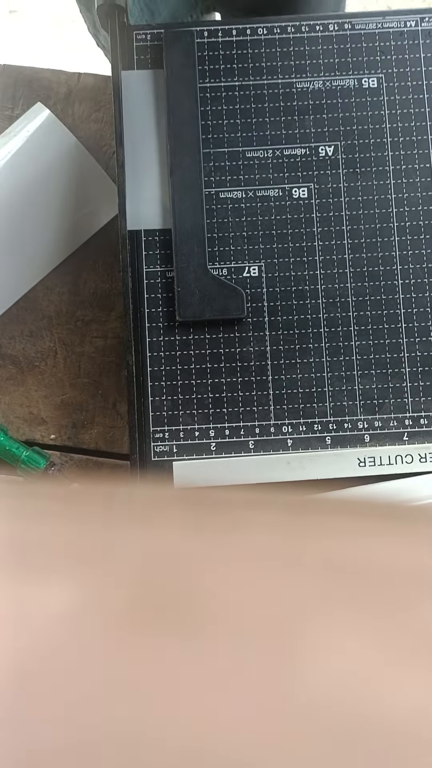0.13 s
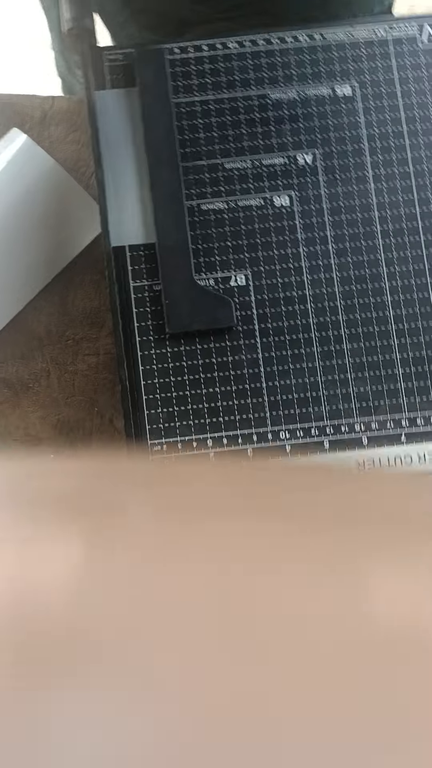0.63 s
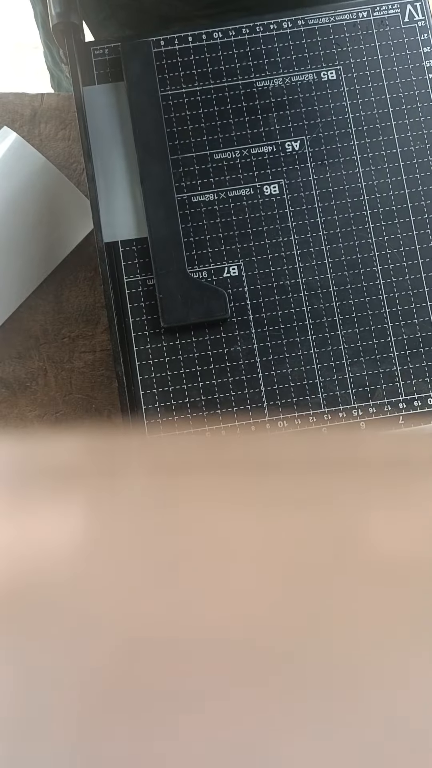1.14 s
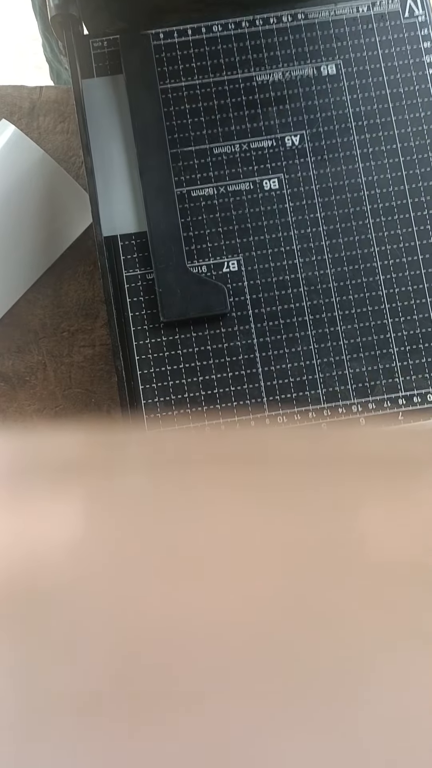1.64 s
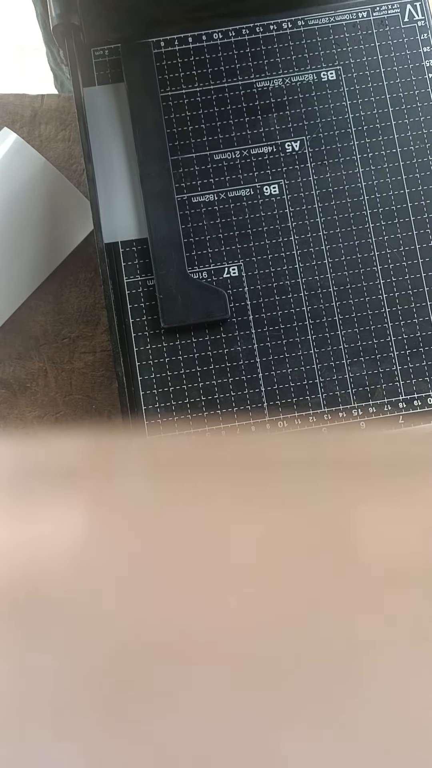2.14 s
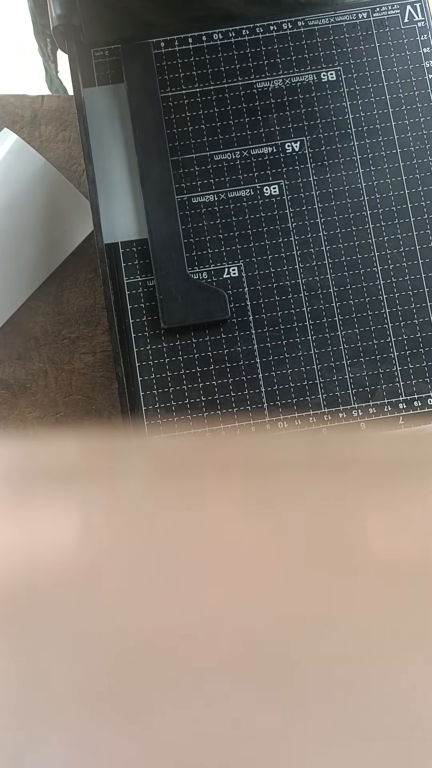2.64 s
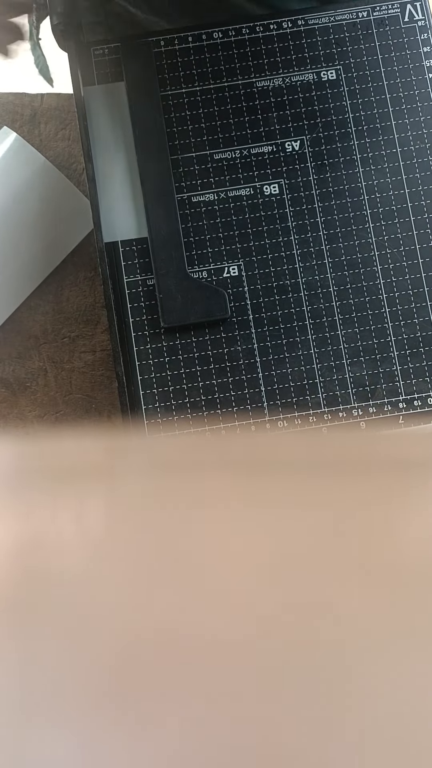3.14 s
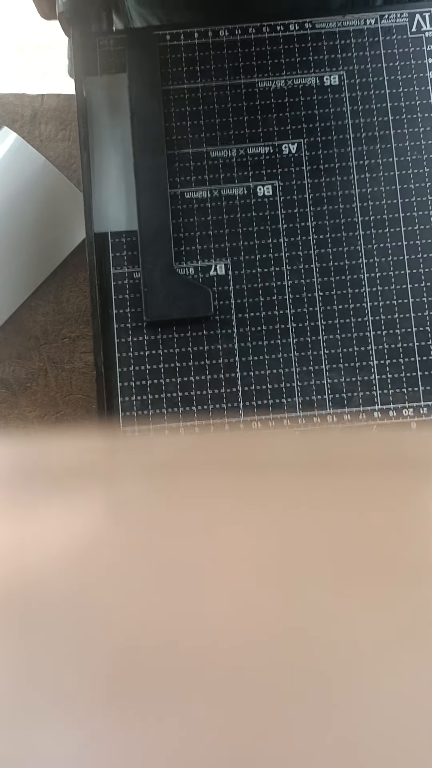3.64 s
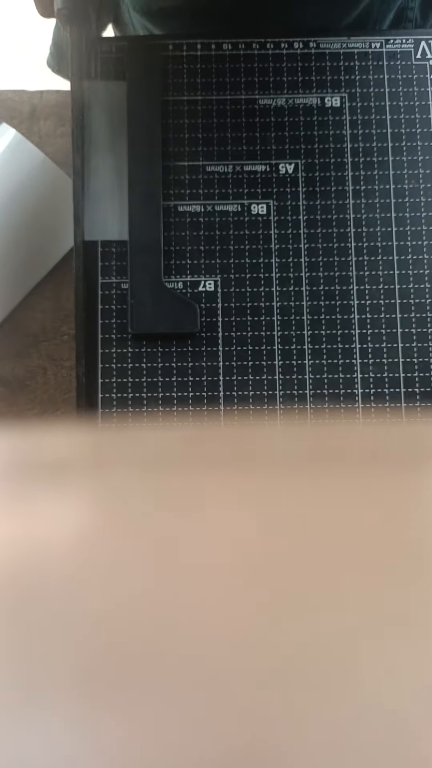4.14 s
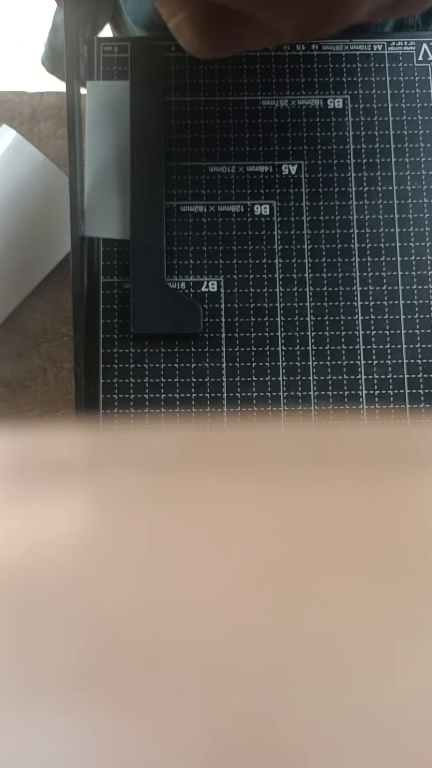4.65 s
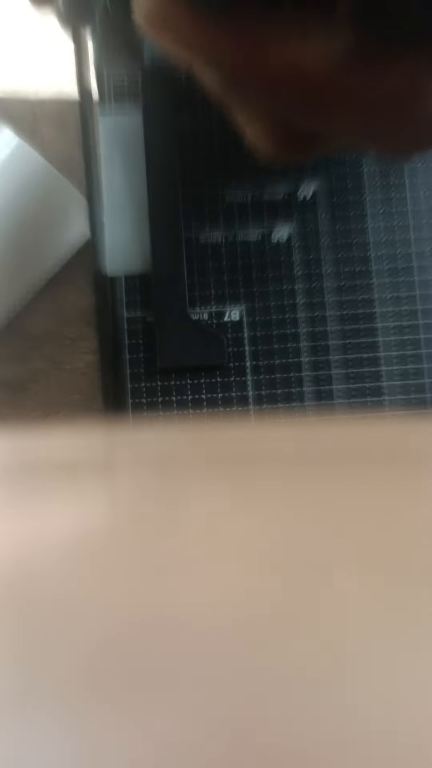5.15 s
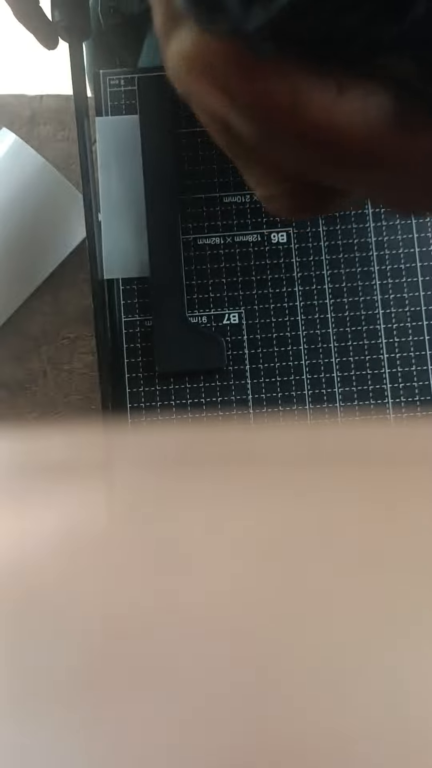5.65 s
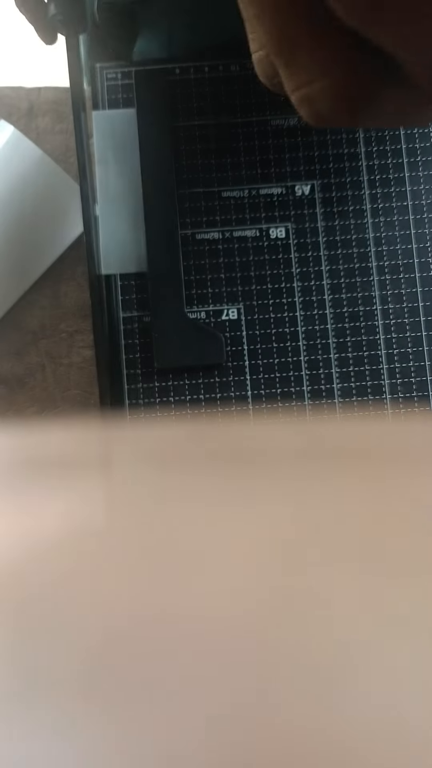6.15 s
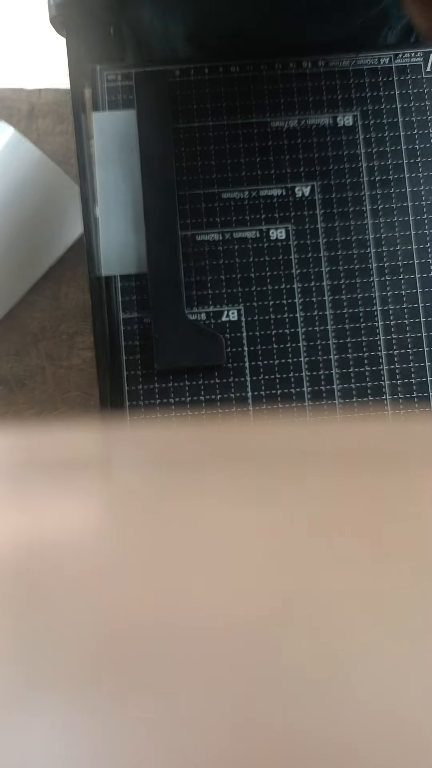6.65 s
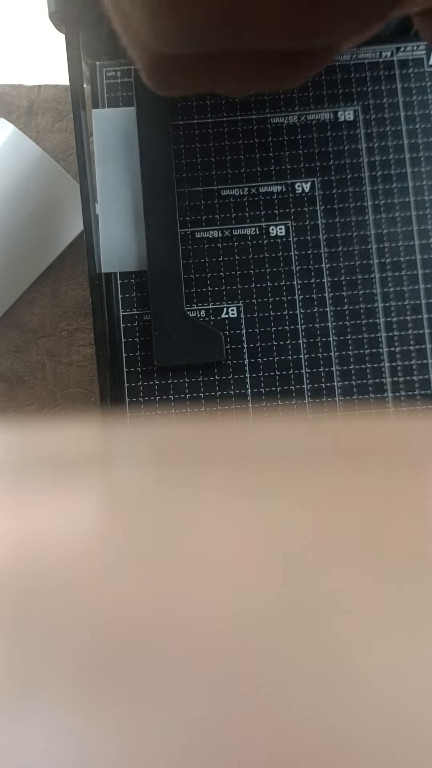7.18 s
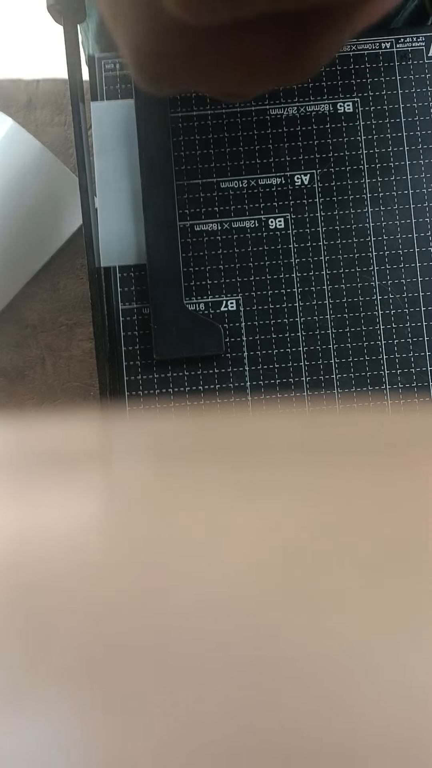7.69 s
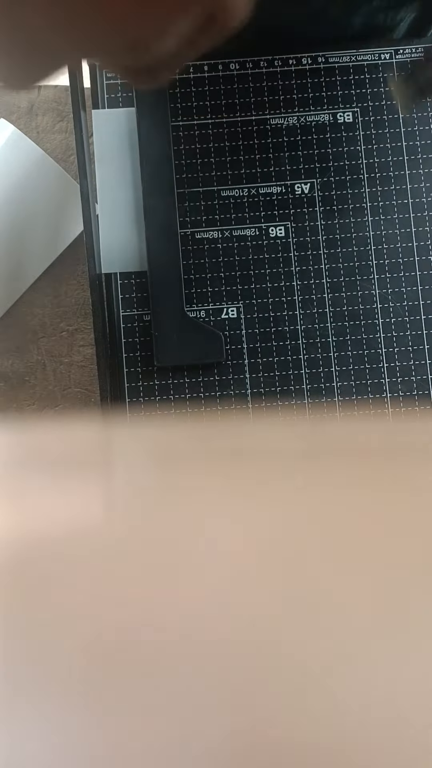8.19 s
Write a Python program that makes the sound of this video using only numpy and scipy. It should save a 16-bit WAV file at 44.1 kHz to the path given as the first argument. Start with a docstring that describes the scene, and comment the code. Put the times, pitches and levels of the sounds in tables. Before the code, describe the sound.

A handheld phone outdoors picks up nonstop rattling crow caws at middle distance, with reverberant small-bird whistles and quick twittering phrases. Occasional dull claps echo across the yard. Midway come very close dry ticks, a double hollow knock, rough skin rubbing, bright little pings and low grip thumps, loudest just after four seconds and again past five. Afterwards cawing and chirping resume over quiet air and thin insect hiss.

```python
"""A walled yard: hoarse crows caw in close succession, each a pulsed voice exciting throat resonances.
Small birds sing phrases, whistles and chips, all gliding sines, with wall echoes of sparse decaying taps.
Insects hiss far off in narrow-band noise, and something claps across the yard in decaying noise bursts.
A hand knocks and rubs the phone and a hollow board: grains of friction, ringing modes and bright pings;
one rough stroke of it, at 4.07 s, is made by the same pulsed voices as the caws."""
import sys
import numpy as np
from scipy import signal
from scipy.fft import rfft, irfft
from scipy.io import wavfile
from scipy.ndimage import uniform_filter1d

SR = 44100
rng = np.random.default_rng(int(sys.argv[2]) if len(sys.argv) > 2 else 0)


def wav_out(sig):
    """Save sig, one row per channel (or a flat mono array), as 16-bit PCM at SR to the path in sys.argv[1]."""
    wavfile.write(sys.argv[1], SR, np.round(np.clip(np.atleast_2d(sig).T, -1, 1) * 32767).astype(np.int16))


def boost_factor(decibels):
    """Convert a level in decibels to a linear amplitude factor."""
    exponent = np.asarray(decibels, float) / 20
    return 10 ** exponent


N = 366030


def evened(x):
    """Energy normalisation: scales a signal to rms 1."""
    return x / np.sqrt(np.mean(x ** 2) + 1e-20)


def read(points, hz):
    """Interpolation over logarithmic frequency, the scale on which spectra are drawn."""
    f, value = np.transpose(points)
    return np.interp(np.log(hz + 1), np.log(f + 1), value)


def curves(rows):
    """Piecewise-linear control: one curve over the whole scene for each column after time."""
    s, *columns = np.transpose(rows)
    return [np.interp(np.arange(N) / SR, s, c) for c in columns]


def add(mix, s, sound):
    """Superposition: adds a sound to the mix, starting at s seconds."""
    part = mix[max(round(s * SR), 0):][:len(sound)]
    part += sound[:len(part)]


def wander(size):
    """Random drift: white noise averaged twice over size samples, rms 1."""
    return evened(uniform_filter1d(uniform_filter1d(rng.standard_normal(N), size), size))


def resonate(x, hz, width):
    """Heterodyne resonance: shifts hz down to zero, smooths with a double pole, and shifts back."""
    turn = np.exp(2j * np.pi * np.cumsum(hz * np.ones(len(x))) / SR)
    r = np.exp(-np.pi * width / SR)
    smooth = signal.lfilter([(1 - r) ** 2], [1, -2 * r, r * r], x / turn)
    return 2 * (turn * smooth).real


def coloured(x, spectrum):
    """Spectral shaping: weights each frequency of x by the spectrum; rms 1."""
    gain = boost_factor(read(spectrum, np.fft.rfftfreq(len(x), 1 / SR)))
    return evened(irfft(rfft(x) * gain, len(x)))


def patchy(x, patchy_db):
    """Random modulation in time and frequency: lumps a few hundred Hz by a few tens of ms."""
    z = signal.stft(x, nperseg=512)[2]
    patches = uniform_filter1d(rng.standard_normal(z.shape), size=9, axis=0)
    patches = evened(uniform_filter1d(patches, size=7, axis=1))
    return signal.istft(z * boost_factor(patchy_db * patches), nperseg=512)[1][:N]


def grains(per_s, spread_db):
    """Shot noise: random impulses at a mean rate, with exponentially spread levels."""
    happens = rng.random(N) < per_s / SR
    level_db = spread_db * np.minimum(rng.exponential(1, N), 4)
    return rng.standard_normal(N) * happens * boost_factor(level_db)


def pressure(s, hold, db, rise, fall):
    """Energy summation of strokes that rise, hold and fall along straight dB slopes; gives dB."""
    t = np.arange(0, N / SR + .002, .001)[:, None]
    each = db - rise * np.maximum(s - t, 0) - fall * np.maximum(t - s - hold, 0)
    total_db = 10 * np.log10((boost_factor(each) ** 2).sum(1) + 1e-14)
    return np.interp(np.arange(N) / SR, t[:, 0], total_db)


def bursts(events, spectrum):
    """Exponential decay: noise starts at once and dies, above 10.5 kHz 2.5 times as fast in dB."""
    t, mix = np.arange(SR // 2) / SR, np.zeros(N)
    noise = patchy(coloured(rng.standard_normal(N + 512), spectrum), patchy_db=3.5)
    noise = evened(np.tile(noise, 2))  # cut at the event's own time, so burst colours vary
    dull = signal.sosfiltfilt(signal.butter(4, 10500, fs=SR, output="sos"), noise)
    treble = evened(noise - dull)
    for s, db, treble_db, t60 in events:
        fall_db = 60 * t / max(t60, .002)
        at = slice(round(s * SR), round(s * SR) + len(t))
        body = boost_factor(db - fall_db) * dull[at]
        top = boost_factor(treble_db - 2.5 * fall_db) * treble[at]
        add(mix, s, body + top)
    return mix


# reverberation of the walls and trees: (frequency [Hz], t60 [s])
YARD_DECAY = [(300, 0.086), (600, 0.59), (1400, 0.67), (4000, 0.34), (7000, 0.29), (15000, 0.39)]


def yard(x, wet_db):
    """Reverberation: direct sound plus sparse echoes, each band dying at its own speed."""
    taps = np.zeros(SR)
    at = np.arange(300, SR - 20, 20)
    taps[at + rng.integers(0, 20, len(at))] = rng.choice([-1., 1.], len(at))
    hz, t, z = signal.stft(taps, SR, nperseg=256)
    decay = boost_factor(-60 * t / read(YARD_DECAY, hz)[:, None])
    tail = signal.istft(z * decay, SR, nperseg=256)[1]
    echo = boost_factor(wet_db) * signal.fftconvolve(x, tail / np.linalg.norm(tail))[:N]
    return (x + echo) / np.sqrt(1 + boost_factor(wet_db) ** 2)


# caws, and one rough stroke of the rubbing hand at 4.071 s:
# (peak time [s], rise [s], fall [s], effort [dB], top pitch before the voice factors [Hz],
# upper rasp [dB]: in a caw, strong when the bird faces the phone)
HOARSE_EVENTS = [(0.0, 0.082, 0.1698, -43, 562, -20.5), (.27, 0.12, .16, -34, 594.5, -22.5),
                 (0.409, 0.087, 0.12, -35, 578, -29), (0.599, 0.11, 0.27, -37.5, 568, -36.5),
                 (0.829, 0.087, 0.3, -31.5, 602.3, -23), (1.191, 0.12, 0.19, -36, 606.7, -56.5),
                 (1.371, 0.074, 0.096, -33.5, 555, -22), (1.499, 0.097, 0.15, -31, 549.8, -25.5),
                 (1.76, 0.14, 0.097, -34, 605.6, -32), (1.969, 0.2, 0.23, -30.5, 601.3, -25.5),
                 (2.29, 0.12, 0.15, -35, 612, -36.5), (2.499, 0.18, 0.17, -27, 604.2, -20.5),
                 (3.059, 0.22, 0.12, -27, 589.4, -19), (3.53, 0.25, 0.23, -28, 595, -23),
                 (3.841, 0.1, 0.21, -31.5, 562.4, -15), (4.071, 0.11, 0.068, -24, 548.5, -12.5),
                 (4.35, 0.11, 0.19, -32.5, 577.3, -19.5), (4.571, 0.18, 0.18, -29, 591.5, -20),
                 (4.96, 0.2, 0.092, -31, 593.5, -21.5), (5.08, 0.09, 0.14, -28.5, 585.6, -13),
                 (5.27, 0.13, 0.14, -34, 560.8, -28), (5.65, 0.19, 0.19, -32.5, 527, -22),
                 (5.931, 0.055, 0.096, -40, 531.6, -22.5), (6.17, 0.21, 0.29, -29, 577, -22),
                 (6.58, 0.11, 0.12, -31.5, 609.9, -18.5), (6.759, 0.13, 0.25, -28, 612.2, -22.5),
                 (7.138, 0.092, 0.1, -38, 535.9, -19.5), (7.301, 0.15, 0.14, -30, 561.8, -25),
                 (7.43, 0.088, 0.21, -32, 539, -23), (7.696, 0.089, 0.13, -39.5, 526.4, -8.5),
                 (7.858, 0.14, 0.21, -32.5, 556.5, -27.5), (8.272, 0.08, 0.15, -37, 543, -33.5)]


def hoarse_controls():
    """Articulation: each caw or stroke is a dome; pitch and throat sag at its ends; the loudest leads."""
    edge_db, dome_power = -14, 2.6  # effort lost one rise or fall from the peak; squareness of the dome
    pitch_sag, rasp_sag, start_sag = .12, 0.1, .5  # shares lost by the end; part of that at the start
    beak_open, beak_closing, rasp_edge_db = 1.0605, 0.088, -6.5  # the beak scales the throat
    peak, rise, fall, db, top_hz, rasp_db = np.transpose(HOARSE_EVENTS)
    t = np.arange(0, N / SR + .004, .002)[:, None]
    away = np.where(t < peak, (peak - t) / rise, (t - peak) / fall)
    power = boost_factor(np.maximum(db + edge_db * away ** dome_power, -200)) ** 2
    lead = power / power.sum(1, keepdims=True)
    edge = np.minimum(away, 1) ** 2
    sag = np.where(t < peak, start_sag * edge, np.minimum(away, 1) ** 1.3)
    pitch_hz = top_hz * (1 - pitch_sag * sag)
    beak = beak_open - beak_closing * sag
    rasp = rasp_db + rasp_edge_db * edge
    arch = 1 - rasp_sag * sag
    effort_db = 10 * np.log10(power.sum(1))
    controls = [effort_db] + [(lead * c).sum(1) for c in (pitch_hz, beak, rasp, arch)]
    return [np.interp(np.arange(N) / SR, t[:, 0], c) for c in controls]


def formants(drive, modes, scale, drift, size):
    """Parallel resonances: drifting modes of alternating sign, all moved together by scale."""
    total = 0
    for k, (f, width, db) in enumerate(modes):
        hz = f * scale * (1 + drift * wander(size))
        total = total + (-1) ** k * boost_factor(db) * resonate(drive, hz, width)
    return total


# throat resonances before beak and body size scale them: (frequency [Hz], width [Hz], level [dB])
THROAT_MODES = [(1116.5, 436, 6.5), (1332, 440, 10), (1563, 301, 7), (1848, 180, -4)]
# the throat passes little outside this band: (low edge [Hz], high edge [Hz])
THROAT_BAND = [820, 2010]
# rasp resonances: (factor on the rasp centre [ratio], width [Hz], level [dB])
RASP_MODES = [(.77, 402, 6.5), (1.0, 302, 11), (1.17, 340, -2), (1.8, 1237, -4.5)]
# throat scale of the leading bird, a smaller factor sounds lower: (time [s], factor on the throat modes
# [ratio])
LEADER_THROAT_SCALE = [(0, 0.95), (.6, 1.01), (.9, 0.99), (1.2, 1.03), (1.5, 0.99), (2.5, 1.013), (3.1, 1.01),
                       (4.1, 0.99), (4.6, 1.007), (5.3, 0.97), (5.65, 0.93), (6.2, 1.017), (6.8, 0.99), (7.4, 0.98),
                       (7.9, 0.92), (8.25, 0.9)]
# the flock as a whole, before voice factors and sag; the low tone is the crows' chest,
# but its high level at 4.0 s belongs to the stroke of the rubbing hand:
# (time [s], rattle rate [1/s], low tone level [dB], rasp centre [Hz])
FLOCK_CURVES = [(0, 110, -32.5, 2670), (.35, 105, -26, 2680), (.65, 101, -20, 2790), (.95, 92, -17.5, 2870),
                (1.25, 109, -21.5, 2970), (1.42, 106, -28, 2850), (1.6, 109, -20.5, 2900),
                (1.85, 90, -23, 3030), (2.3, 89, -23.5, 2860), (2.55, 78.4, -20, 2690),
                (3.05, 94.7, -15.5, 2840), (3.5, 94.3, -24, 2930), (4.0, 87, -6, 2680),
                (4.5, 71, -20, 2930), (5.1, 68, -17.5, 2900), (5.65, 88, -15.5, 3270),
                (6.2, 88.4, -21, 3210), (6.58, 107, -16.5, 2940), (6.7, 119, -18, 3340),
                (6.85, 112, -18.5, 3140), (7.1, 98, -40.5, 2920), (7.27, 87, -17.5, 3000),
                (7.48, 88.4, -17.5, 2990), (7.6, 94, -28, 2860), (7.9, 98, -17, 2420),
                (8.2, 103, -28, 2790)]


def crows_and_rough_stroke():
    """Source and filter: three rattling voices excite one throat; the stroke at 4.07 s shares them."""
    effort_db, pitch_hz, beak, rasp_db, arch = hoarse_controls()
    rattle, low_tone_db, rasp_hz = curves(FLOCK_CURVES)
    drive = 0
    for factor, share in ((1.001, 0.63), (.87, 0.55), (.765, 0.45)):
        unsteady = 1 + 0.00625 * wander(size=300) + .015 * wander(size=3000)
        turns = np.cumsum(factor * pitch_hz * unsteady) / SR
        voice = sum(np.cos(2 * np.pi * k * turns) for k in range(1, 11))
        uneven = 1.05 + 0.03 * wander(size=600) + 0.04004 * wander(size=4000)
        beats = np.cumsum(factor * rattle * arch * uneven) / SR  # of a slower membrane
        chop = 0.07 + np.sin(np.pi * beats) ** 4  # sidebands at the rattle rate
        drive = drive + share * chop * (evened(voice) + .4 * rng.standard_normal(N))
    low_tone = resonate(drive, pitch_hz * (1 + .08 * wander(size=3000)), 190)
    low_tone = low_tone * boost_factor(3 * wander(size=1200))  # comes and goes
    throat = formants(drive, THROAT_MODES, beak * curves(LEADER_THROAT_SCALE)[0], drift=0.018, size=2500)
    throat = signal.sosfilt(signal.butter(3, THROAT_BAND, "band", fs=SR, output="sos"), throat)
    rasp = formants(drive, RASP_MODES, rasp_hz * arch, drift=0.02, size=3000)
    voices = evened(throat) + boost_factor(low_tone_db) * evened(low_tone) + boost_factor(rasp_db) * evened(rasp)
    return yard(boost_factor(effort_db) * voices, wet_db=1.0)


# insect loudness: (time [s], level [dB])
INSECT_LEVEL = [(0.0, -73), (0.95, -61), (2.0, -62.5), (3.3, -58), (4.4, -59), (6.7, -59), (8.3, -60)]


def insects():
    """Band-limited noise: a high hiss whose level drifts and flickers."""
    spectrum = [(7000, -76.5), (8200, -8.5), (8900, 3.5), (9900, 9.5), (10500, -6.5), (11200, -37.5)]
    hiss = coloured(rng.standard_normal(N), spectrum)
    return boost_factor(curves(INSECT_LEVEL)[0] + 0.4 * wander(size=500)) * hiss


# spectrum of the quiet air: (frequency [Hz], level [dB])
AIR_SPECTRUM = [(30, -10), (100, -10.5), (300, -15), (800, -7), (1300, -1), (1700, -10.5), (2200, -20),
                (4000, -22), (6700, -23.5), (8000, -53), (11000, -51.5)]


def air():
    """Ambient noise: a steady coloured floor, patchy in time and frequency."""
    return boost_factor(-58) * patchy(coloured(rng.standard_normal(N), AIR_SPECTRUM), patchy_db=3.5)


# shifts of the grip: (time [s], level [dB], hold [s])
GRIP_SHIFTS = [(0.025, -55.5, 0.015), (0.637, -63, 0.028), (1.975, -73, 0.08), (2.248, -71, 0.014),
               (2.567, -62, 0.027), (2.792, -32.5, 0.0076), (2.823, -52, 0.012), (3.034, -43, 0.052),
               (3.282, -53, 0.061), (3.364, -45.5, 0.032), (3.608, -48.5, 0.086), (3.755, -38.5, 0.025),
               (3.864, -44, 0.035), (3.96, -53, 0.0098), (4.154, -48, 0.018), (4.232, -52, 0.024),
               (4.416, -51, 0.055), (4.728, -54, 0.036), (4.854, -42, 0.044), (5.045, -27, 0.031),
               (5.133, -41, 0.03), (5.212, -20.5, 0.012), (5.304, -38, 0.083), (5.48, -63.5, 0.17),
               (6.017, -71, 0.024), (6.16, -64.5, 0.034), (6.259, -74, 0.015), (6.543, -54, 0.055),
               (6.972, -80, 0.03), (7.481, -70.5, 0.03346), (7.638, -51, 0.024), (7.704, -38.5, 0.018),
               (7.8, -50, 0.01), (7.982, -50.5, 0.021), (8.277, -49, 0.037)]


def grip_rumble():
    """Handling noise: low-frequency noise swells with each shift of the grip, above a faint rest."""
    s, db, hold = np.transpose(GRIP_SHIFTS)
    rise_db_per_s, fall_db_per_s, rest_db = 1799.5, 353.5, -68.5
    grip = boost_factor(pressure(s, hold, db, rise_db_per_s, fall_db_per_s)) + boost_factor(rest_db)
    spectrum = [(20, -10.5), (45, -0.5), (78, 8.5), (100, 1.5), (140, 7), (200, -3.5), (400, -16.5),
                (900, -88.0)]
    return grip * coloured(rng.standard_normal(N), spectrum)


def note(db, length, start_hz, end_hz, bend=2):
    """Frequency modulation: a gliding sine with a slight 190 Hz flutter and soft ends."""
    u = np.linspace(0, 1, round(max(length, .003) * SR))
    # bend 2 starts gently, steepens and settles; bend 1 is steepest as it arrives
    glide = np.cos(np.pi / 2 * np.minimum(u / 0.895, 1)) ** bend
    flutter = 1 + 0.011 * np.sin(2 * np.pi * (190 * u * length + rng.random()))
    hz = (end_hz + (start_hz - end_hz) * glide) * flutter
    return boost_factor(db) * np.sin(2 * np.pi * np.cumsum(hz) / SR) * signal.windows.tukey(len(u), .7)


# single chips, tweets and coos, and one steady low chest tone of a crow at 1.42 s:
# (time [s], level [dB], length [s], start pitch [Hz], end pitch [Hz])
SINGLE_TONES = [(.03, -46.5, 0.06, 164, 166), (.135, -44.5, 0.064, 499, 485), (.36, -55, 0.096, 700, 648),
                (.56, -47.5, 0.045, 641, 566), (1.29, -56, 0.09, 610, 608), (1.42, -40, .2, 527, 521.2),
                (0.586, -68, 0.095, 4160, 4050), (0.814, -78, 0.075, 4750, 5100),
                (1.14, -66, 0.1, 6400, 7000), (1.182, -70, 0.074, 3780, 3880),
                (1.244, -56.5, 0.058, 7140, 6370), (1.443, -60.5, 0.13, 5150, 4890),
                (1.715, -41.5, 0.035, 650, 700), (1.93, -40.5, 0.055, 657, 638),
                (2.119, -42, 0.12, 629.6, 630), (2.34, -47.5, 0.18, 316, 294),
                (2.45, -44.5, 0.14, 604, 625), (5.141, -55.5, 0.043, 6240, 6600),
                (5.189, -62, 0.047, 5500, 7160), (6.23, -59, 0.07, 6450, 7500),
                (6.3, -57, 0.077, 7560, 6700),  (7.1, -59, 0.22, 4100, 4310), (7.12, -70, .12, 5400, 5780),
                (7.1, -69, 0.11, 6500, 6740), (7.392, -60, 0.054, 6770, 7220),
                (7.398, -66, 0.05, 4600, 4540), (4.098, -67, 0.058, 6800, 5790)]


def single_tones():
    """Reverberant ratio: single bird notes and one crow's chest tone, with more echo than direct sound."""
    echoing = np.zeros(N)
    for s, *rest in SINGLE_TONES:
        add(echoing, s, note(*rest))
    return yard(echoing, wet_db=3.5)


# one rising whistle: (time [s], pitch [Hz], level [dB])
WHISTLE_SHAPE = [(0, 1960, -9.5), (.018, 2120, -9.5), (0.043, 2410, -7.5), (0.083, 2790, -1),
                 (0.105, 2920, 2.5), (.125, 2890, -18.5), (0.143, 3110, -25), (0.189, 2910, -35)]
# its repeats: (time [s], level [dB], stretch in time [ratio], factor on pitch [ratio])
WHISTLE_EVENTS = [(0.035, -46, .95, .96), (.462, -37.5, 0.92, 0.99), (5.418, -34.5, 1.05, 1.01),
                  (5.825, -34, 1.1, 1.004)]


def whistles():
    """Time and pitch scaling: one rising sine contour, repeated far off in altered copies."""
    far = np.zeros(N)
    for start, top_db, stretch, pitch in WHISTLE_EVENTS:
        s, hz, db = np.transpose(WHISTLE_SHAPE)
        s, db = start + stretch * s, top_db + db
        t = np.arange(s[0], s[-1], 1 / SR)
        hz = pitch * uniform_filter1d(np.interp(t, s, hz), size=400)
        tone = np.sin(2 * np.pi * np.cumsum(hz) / SR)
        add(far, s[0], boost_factor(np.interp(t, s, db)) * tone * signal.windows.tukey(len(t), .15))
    return yard(far, wet_db=3.5)


# notes of one song phrase, timed from its last note, before random variation:
# (time [s], length [s], start pitch [Hz], end pitch [Hz], level [dB])
PHRASE_NOTES = [(-.157, 0.011, 3980, 3930, -18), (-.147, 0.045, 3960, 3820, -8),
                (-.116, 0.026, 4250, 3700, -5), (-.09, 0.0082, 3750, 3730, -22.5),
                (-.082, 0.0058, 5500, 5470, -11.5), (-.075, 0.016, 6100, 6750, -10),
                (-.062, .014, 6750, 6800, -7), (-.052, 0.016, 6800, 6080, -8),
                (-.038, 0.011, 4350, 4500, -6.5), (-.022, 0.023, 4680, 4530, -2),
                (0.0, 0.037, 5840, 5050, 2)]
# repeats of the phrase: (time of its last note [s], level [dB])
SONG_TIMES = [(0.196, -38), (2.128, -37), (2.438, -33.5), (2.751, -35.5), (3.066, -31), (5.214, -30),
              (5.533, -30.5), (7.858, -32.5), (8.18, -30.5)]


def song_phrases():
    """Repetition with variation: a quick phrase of gliding notes, about half of it echo."""
    near = np.zeros(N)
    for s, db in SONG_TIMES:
        for offset, length, start_hz, end_hz, note_db in PHRASE_NOTES:
            pitch, louder_db = rng.normal([1, 0], [.008, 1.5])  # no two notes alike
            tone = note(db + note_db + louder_db, length, pitch * start_hz, pitch * end_hz)
            add(near, s + offset, tone)
    return yard(near, wet_db=1.5)


# claps: (time [s], crack level [dB], treble level [dB], t60 of the crack [s], low boom level [dB])
CLAP_EVENTS = [(0.3297, -43.5, -87, 0.42, -49), (0.5848, -57, -83, 0.24, -70),
               (0.9264, -31, -64, 0.2, -31.5), (2.0089, -32.5, -45.5, 0.43, -38.5),
               (7.288, -46.5, -71, 0.054, -82), (7.5688, -29.5, -49.5, 0.35, -46)]
# spectrum of the crack: (frequency [Hz], level [dB])
CRACK_SPECTRUM = [(300, -46), (700, -22.5), (1040, -6), (1400, 0.5), (1810, -4.5), (2400, -8), (4770, -10),
                  (16000, -46)]
# spectrum of the boom: (frequency [Hz], level [dB])
BOOM_SPECTRUM = [(120, -39.5), (200, -19.5), (334, -12.5), (623, 3.5), (806, 1.5), (1100, -49)]


def claps():
    """Two-part impulse: a bright crack and a low boom with a t60 1.86 times as long."""
    crack = [row[:4] for row in CLAP_EVENTS]
    boom = [(s, boom_db, -200, 1.86 * t60) for s, db, treble_db, t60, boom_db in CLAP_EVENTS]
    return bursts(crack, CRACK_SPECTRUM) + bursts(boom, BOOM_SPECTRUM)


# ticks: (time [s], level [dB], treble level [dB], t60 [s])
TICK_EVENTS = [(.6325, -79.5, -66, 0.014), (.6559, -83, -50, 0.014), (2.0742, -52.5, -37, 0.014),
               (2.5446, -83, -69.5, 0.024), (2.5716, -87.5, -56, 0.015), (2.6783, -80, -61, 0.028),
               (2.7417, -80, -44, 0.011), (2.7815, -17.5, -35, 0.012), (2.7916, -14.5, -36.5, 0.005),
               (3.0554, -28, -26, 0.019), (3.3742, -41, -63, .02), (3.5919, -30, -69, 0.022),
               (3.8352, -42, -70, 0.04), (3.9549, -41.5, -57.5, 0.022), (3.9925, -25.5, -41, 0.015),
               (4.0143, -34, -37.5, 0.018), (4.0625, -16, -28, 0.02), (4.106, -21.5, -37.5, 0.027),
               (4.1427, -17.5, -33, 0.013), (4.2158, -26.5, -50.5, 0.043), (4.2733, -28.5, -64, 0.066),
               (4.3093, -26, -71, 0.0305), (4.563, -35, -63.5, 0.083), (4.7324, -35, -75, 0.004),
               (4.888, -22, -42.5, 0.051), (5.0406, -38, -64, 0.0098), (5.0584, -25, -63, 0.011),
               (5.2005, -39.5, -61.5, 0.021), (5.2307, -13.5, -45.5, 0.045), (7.9404, -76.5, -70.5, 0.014),
               (7.9613, -87, -52, 0.018), (8.0775, -84, -58, 0.016), (8.1359, -70.5, -46.5, 0.014),
               (8.2521, -81, -64, 0.021)]
# their spectrum: (frequency [Hz], level [dB])
TICK_SPECTRUM = [(59, -29), (100, 12.5), (1270, -1), (2120, -25), (2920, -13), (3470, -2), (5210, 3.5),
                 (7810, -13.5), (10100, -33), (11200, -30.5), (14500, -33), (16500, -29)]


def ticks():
    """Transient excitation: short dry bursts of coloured noise."""
    return bursts(TICK_EVENTS, TICK_SPECTRUM)


# crackles of the case under the fingers: (time [s], level [dB], treble level [dB], t60 [s])
CRACKLE_EVENTS = [(2.7815, -10.5, -70, 0.0096), (3.9914, -23, -56, 0.13), (4.0135, -11.5, -65, 0.057),
                  (4.021, -22, -60, 0.034), (4.039, -20.5, -67, 0.045), (4.0495, -18.5, -57.5, 0.049),
                  (4.0632, -20, -49, 0.035), (4.074, -20, -63.5, 0.029), (4.087, -29, -53.5, 0.024),
                  (4.1032, -13, -55, 0.074), (4.113, -10, -55, 0.026), (4.143, -33.5, -49, 0.067),
                  (4.178, -38, -53, 0.05), (5.0406, -22.5, -68, 0.05), (5.2005, -22.5, -70.5, 0.027),
                  (5.2307, -13.5, -61.5, 0.093)]
# colour of skin on the case, shared with the scrape of the rub: (frequency [Hz], level [dB])
SCRAPE_SPECTRUM = [(410, -27), (700, -8), (922, -9.5), (1190, -2), (1720, -8), (2800, -9.5), (3300, -12.5),
                   (5540, -15), (8000, -34), (10400, -57), (17600, -120)]


def crackles():
    """Transient excitation: brief bursts with the colour of the scrape."""
    return bursts(CRACKLE_EVENTS, SCRAPE_SPECTRUM)


# modes of the hollow board: (frequency [Hz], level [dB], t60 [s])
BOARD_MODES = [(160, -25.5, 0.22), (252, -13.5, 0.12), (440, -3, 0.065), (479, 2, 0.23), (532, 9.5, 0.099),
               (700, 7.5, 0.025), (1180, -29.5, 0.047)]


def board_ring():
    """Modal synthesis: the board's response is a sum of decaying sines."""
    t = np.arange(SR // 4) / SR
    ring = sum(boost_factor(db - 60 * t / t60) * np.sin(2 * np.pi * hz * t) for hz, db, t60 in BOARD_MODES)
    return ring * (1 - np.exp(-t / 0.0015))  # a soft fingertip gives no click


# knocks on the board: (time [s], level [dB], low thud level [dB])
KNOCK_EVENTS = [(2.847, -62.5, -19), (3.518, -61, -61), (3.7206, -6, -32), (3.7319, -10, -42.5),
                (4.33, -22.5, -56), (4.404, -21, -57), (4.582, -31.5, -51), (4.705, -38, -65),
                (4.823, -36, -49), (4.849, -31.5, -55), (4.925, -39, -65), (5.0416, -18.5, -42),
                (5.078, -18.5, -60), (5.196, -26, -10), (5.218, -57, -12), (6.354, -29, -66),
                (6.495, -29.5, -84), (6.568, -31, -51), (7.695, -43, -52)]


def knocks(ring):
    """Impulse response: each knock rings the board and adds a low thud at the microphone."""
    t, mix = np.arange(len(ring)) / SR, np.zeros(N)
    thud = np.sin(2 * np.pi * 135 * t) * boost_factor(-60 * t / 0.015)
    for s, db, thud_db in KNOCK_EVENTS:
        add(mix, s, boost_factor(db) * ring / abs(ring).max() + boost_factor(thud_db) * thud)
    return mix


# strokes of the rubbing hand:
# (time [s], hold [s], scrape level [dB], level fed into the board [dB], dull shuffle level [dB])
RUB_STROKES = [(3.363, 0.041, -48.5, -51.5, -55), (3.523, 0.093, -44.5, -43.5, -44),
               (3.588, 0.093, -38.5, -37.5, -58), (3.725, 0.017, -64.5, -15, -24.5),
               (3.808, 0.043, -41, -32, -36), (3.928, 0.13, -40, -40, -42.5),
               (4.004, .015, -19.5, -24, -31), (4.027, 0.011, -24, -19, -46),
               (4.033, 0.011, -15.5, -19.5, -40), (4.072, 0.022, -20.5, -17, -30),
               (4.13, 0.04, -27, -27.5, -33.5), (4.233, 0.094, -37, -33, -45),
               (4.408, 0.046, -43, -36, -37.5), (4.541, 0.048, -41, -44, -57),
               (4.695, 0.066, -38.5, -43, -79), (4.819, 0.0385, -46.5, -38, -43),
               (4.878, 0.054, -41.5, -44, -71), (4.952, 0.07, -43, -39.5, -75),
               (5.052, 0.013, -25, -25, -27), (5.082, 0.013, -66, -24.5, -58),
               (5.207, 0.0225, -31, -21.5, -19), (5.236, 0.021, -33, -42, -25),
               (5.296, 0.034, -40, -32, -43), (5.385, 0.037, -49, -61, -67)]


def rubbing(ring):
    """Friction: skin slips in uneven grains, heard as scrape, fizz, shuffle and the ringing board."""
    s, hold, *layers = np.transpose(RUB_STROKES)
    slow_start_s = 0.036  # strokes held longer than this swell in gently
    rise_db_per_s = 2602 / (1 + (hold / slow_start_s) ** 2)
    scrape_db, feed_db, shuffle_db = (pressure(s, hold, db, rise_db_per_s, fall=334) for db in layers)
    fizz_db = -21.5 + 1.29 * scrape_db  # the fizz grows faster than the scrape

    slips = grains(per_s=16000, spread_db=1.5) * boost_factor(2.5 * wander(size=250))
    scrape = boost_factor(scrape_db) * evened(patchy(coloured(slips, SCRAPE_SPECTRUM), patchy_db=4))
    fizz_spectrum = [(6000, -87), (8000, -11.5), (11000, 6.5), (15000, -8.5), (17000, -14.0)]
    fizz = boost_factor(fizz_db) * coloured(slips, fizz_spectrum)
    shuffle_spectrum = [(60, -38.5), (130, 1.0), (240, 15.0), (380, -1.0), (800, -75.5)]
    shuffle = boost_factor(shuffle_db) * coloured(grains(per_s=1100, spread_db=-0.5), shuffle_spectrum)

    damped = ring * boost_factor(-60 * np.arange(len(ring)) / SR / .3)  # the resting hand damps the board
    feed = evened(grains(per_s=540, spread_db=2.0)) * boost_factor(feed_db)
    ringing = signal.fftconvolve(feed, damped / np.linalg.norm(damped))[:N]
    return scrape + fizz + shuffle + ringing


# pings of a fingernail on the case: (time [s], level [dB], frequency of the lower mode [Hz])
PING_EVENTS = [(4.015, -7, 2750), (4.0623, -20, 4070), (4.063, -27, 5570), (4.108, -13.5, 2720),
               (4.1436, -29, 5460), (4.2725, -30.5, 5318), (4.309, -26, 5260), (4.321, -33.5, 5300),
               (4.564, -24, 5190), (4.729, -30, 5502), (4.742, -28, 4200), (4.888, -22, 5340),
               (5.042, -34, 6550), (5.057, -38, 7000)]


def pings():
    """Modal pair: each ping rings two close case modes with a t60 of 25 ms."""
    t, mix = np.arange(SR // 10) / SR, np.zeros(N)
    for s, db, hz in PING_EVENTS:
        upper = np.sin(2 * np.pi * (1.06 * hz * t + rng.random()))
        pair = np.sin(2 * np.pi * hz * t) + .7 * upper
        add(mix, s, boost_factor(db - 60 * t / .025) * (1 - np.exp(-t / .0006)) * pair)
    return mix


# steep chips from behind a wall: (time [s], level [dB], length [s], start pitch [Hz], end pitch [Hz])
HIDDEN_CHIPS = [(5.709, -32.5, 0.03, 5820, 3800), (5.811, -36.5, 0.023, 3930, 5020),
                (5.831, -39.5, 0.018, 5070, 3400), (6.112, -30.5, 0.03, 5800, 3490)]


def hidden_chips():
    """Occlusion: behind a wall, steep chips are heard mostly as echo."""
    hidden = np.zeros(N)
    for s, *rest in HIDDEN_CHIPS:
        add(hidden, s, note(*rest, bend=1))
    return yard(hidden, wet_db=13)


def scene():
    """Superposition: sums the birds, the background, the claps and the hand."""
    ring = board_ring()
    background = insects() + air()
    small_birds = whistles() + song_phrases() + hidden_chips()
    voices = crows_and_rough_stroke() + single_tones() + small_birds
    hits = claps() + ticks() + crackles() + knocks(ring) + pings()
    hand = grip_rumble() + rubbing(ring)
    return (voices + background + hits + hand)[None]


def top_cut(x):
    """Nothing passes above the cut-off."""
    return signal.sosfilt(signal.butter(12, 15850, fs=SR, output="sos"), x)


def record(dry):
    """Transduction: a microphone with bass cut and top resonance, noise suppression, soft saturation."""
    x = dry + boost_factor(1.5) * resonate(dry[0], 15000, 1600)
    x = signal.sosfilt(signal.butter(3, 65, "high", fs=SR, output="sos"), x)
    z = signal.stft(x, nperseg=512, noverlap=384)[2]
    level_db = 10 * np.log10(uniform_filter1d(abs(z) ** 2, size=9, axis=-1) + 1e-16)
    over_db = level_db - np.percentile(level_db, 20, -1, keepdims=True)
    z *= boost_factor(-7 * np.clip(1 - over_db / 9, 0, 1))  # bins near their quiet level drop by up to 7 dB
    clean = signal.istft(z, nperseg=512, noverlap=384)[1][:, :N]
    finished = 0.52 * np.tanh(clean / 0.64)
    return top_cut(finished)


dry = scene()
out = record(dry)
wav_out(out)
```